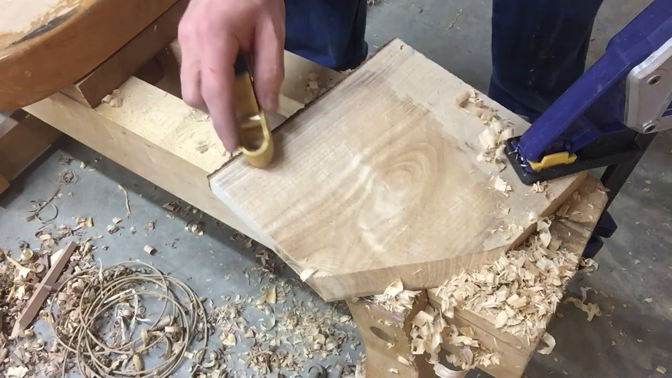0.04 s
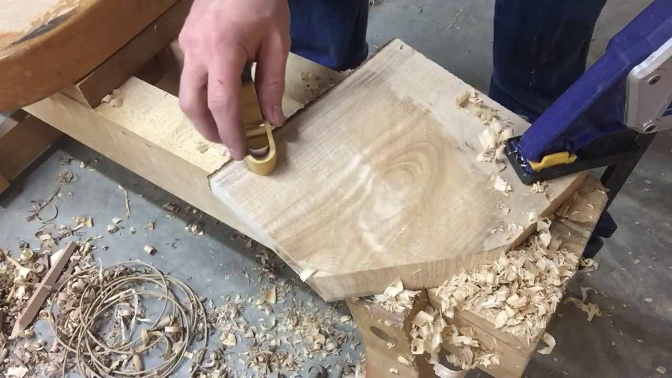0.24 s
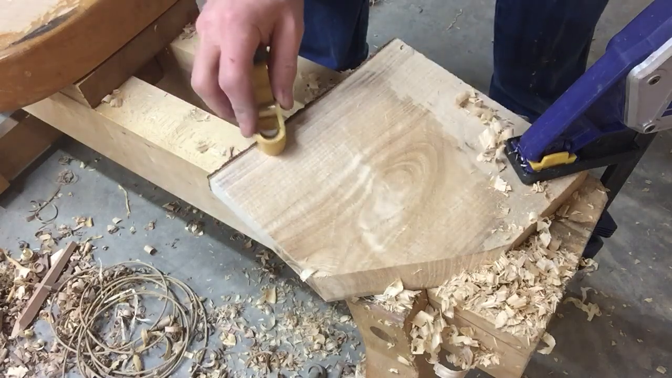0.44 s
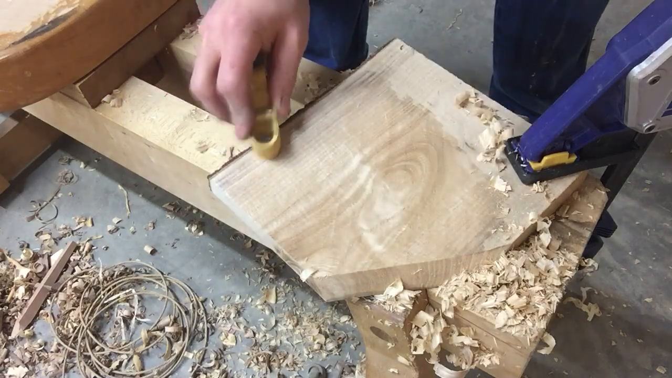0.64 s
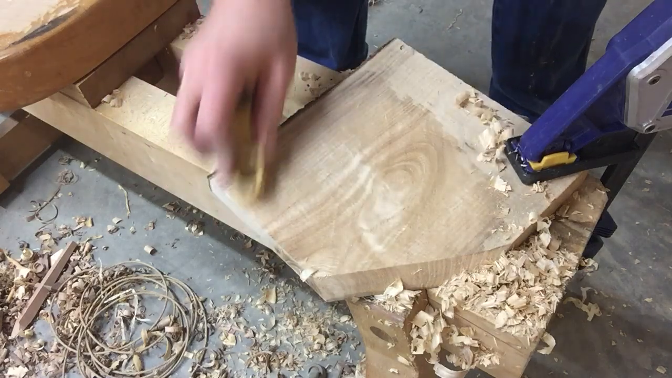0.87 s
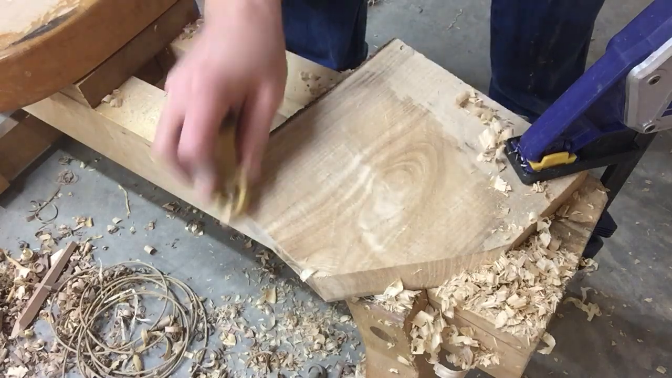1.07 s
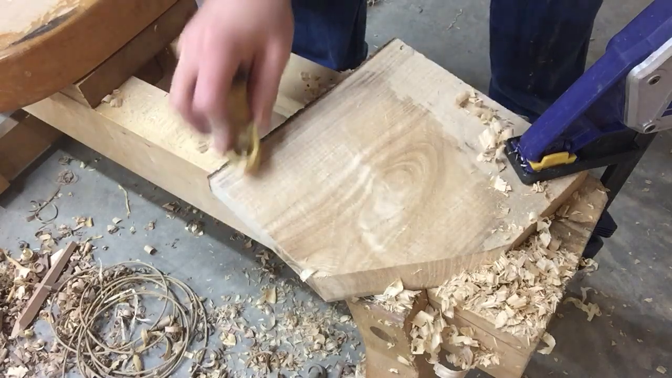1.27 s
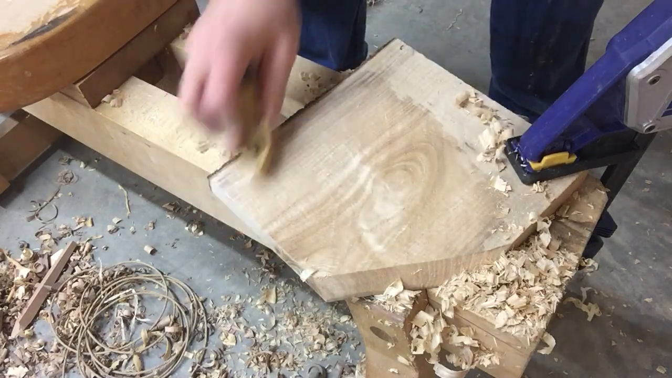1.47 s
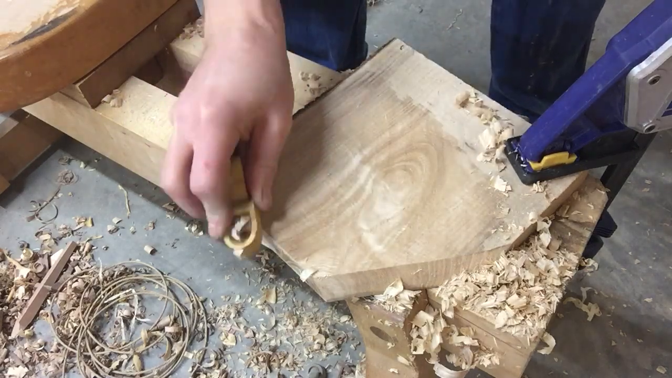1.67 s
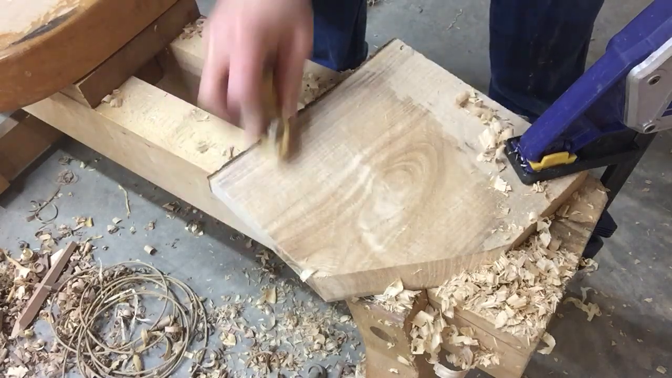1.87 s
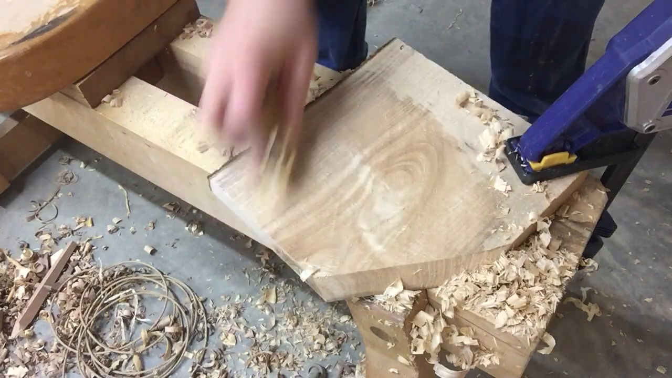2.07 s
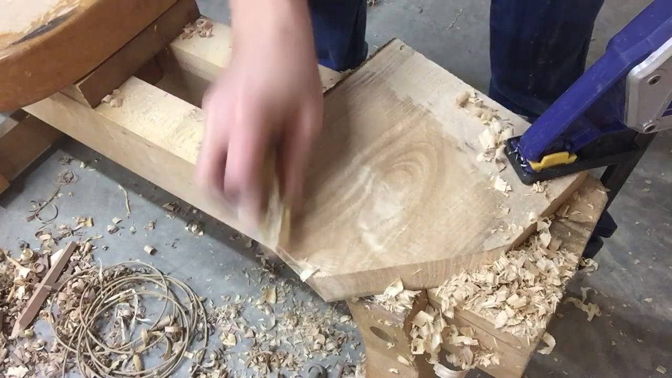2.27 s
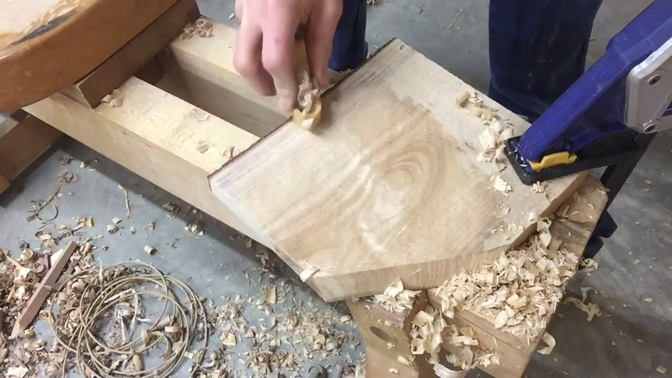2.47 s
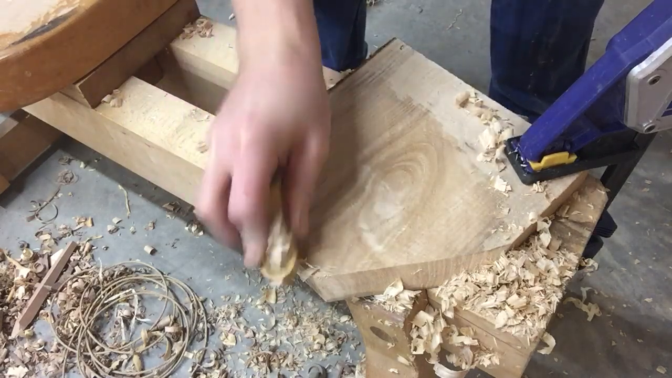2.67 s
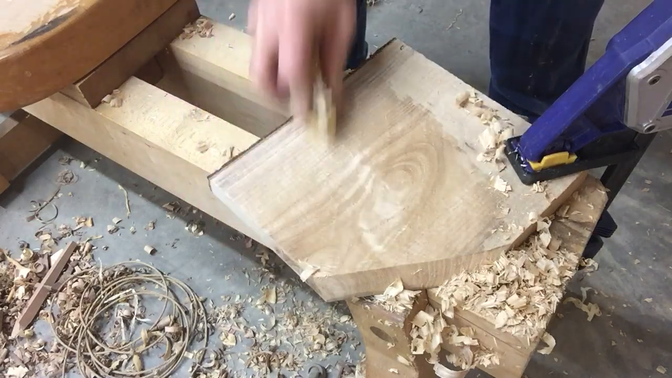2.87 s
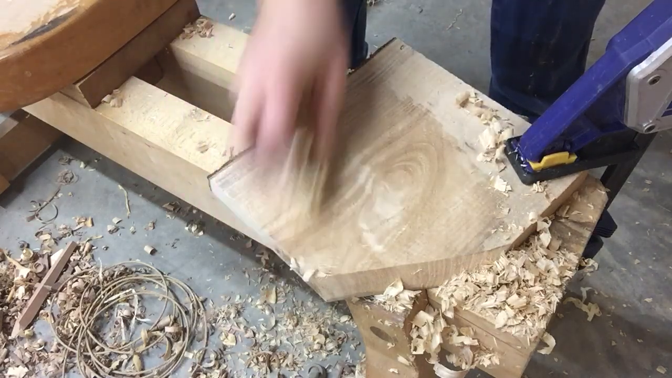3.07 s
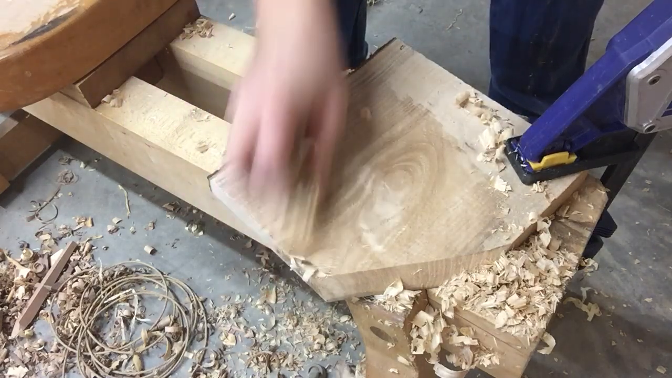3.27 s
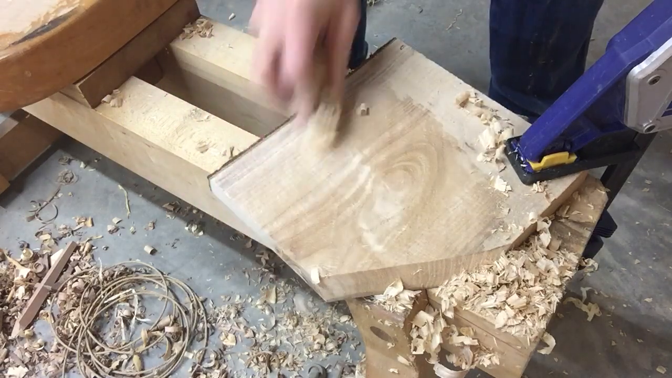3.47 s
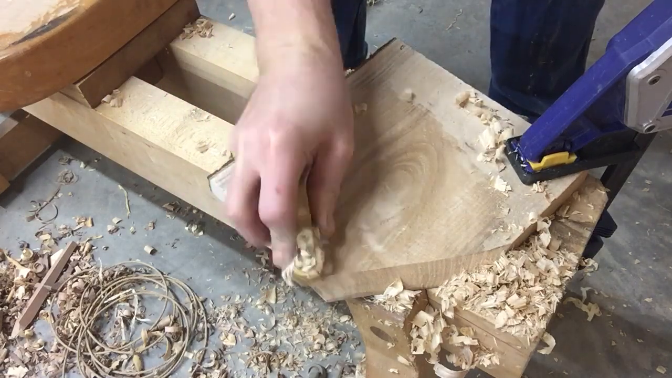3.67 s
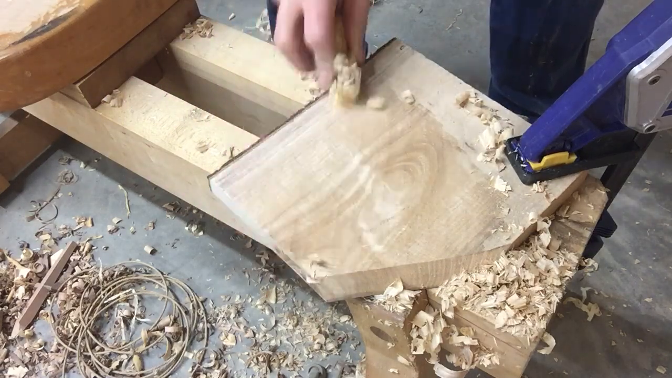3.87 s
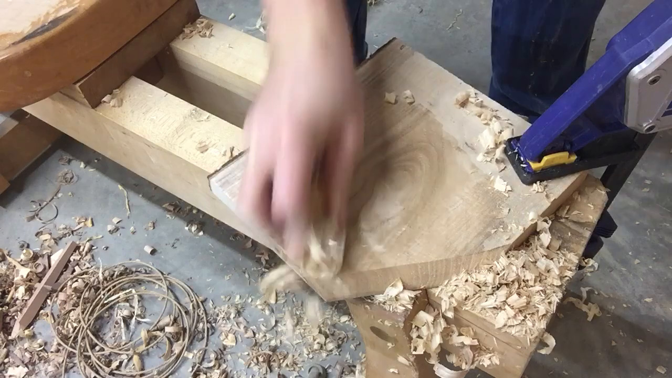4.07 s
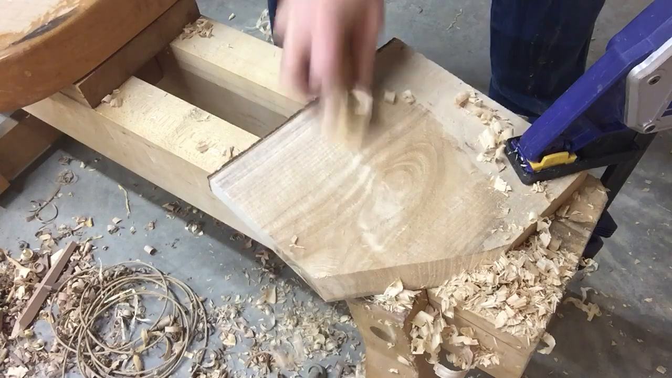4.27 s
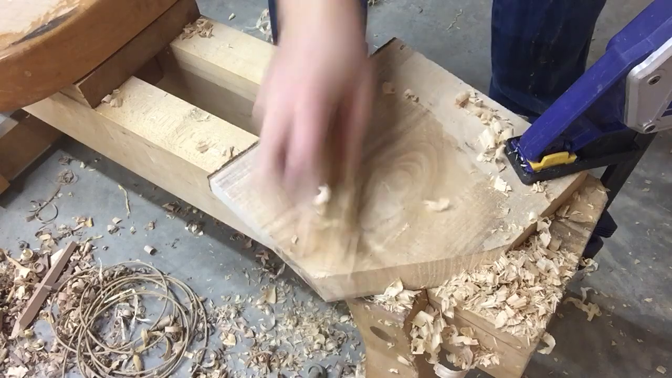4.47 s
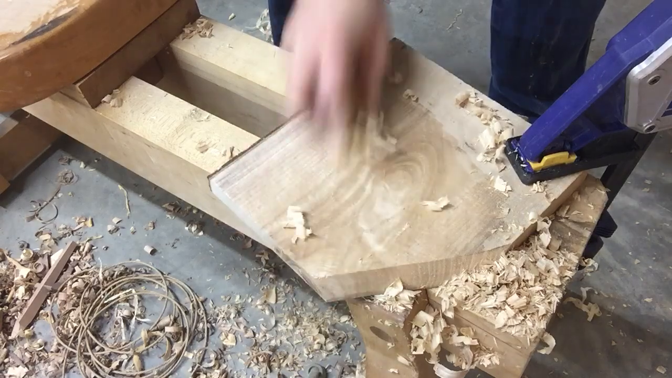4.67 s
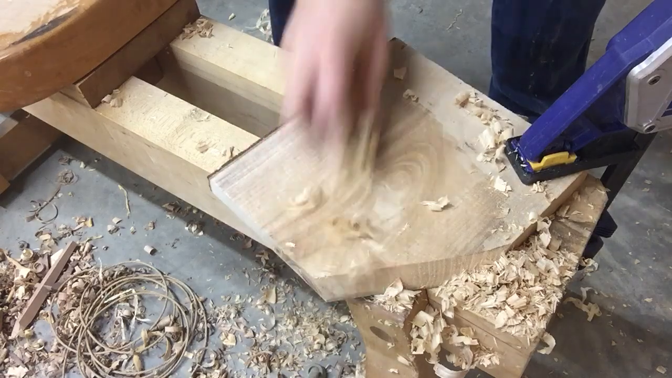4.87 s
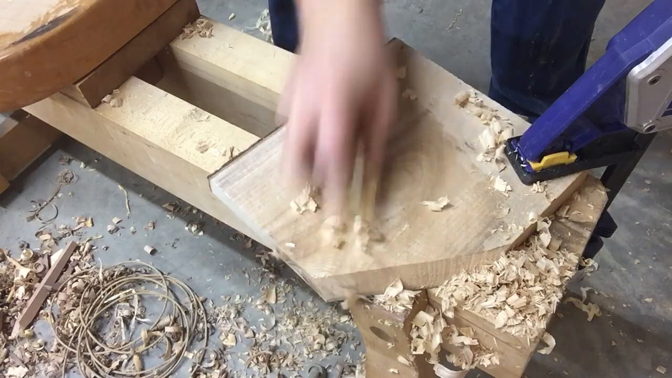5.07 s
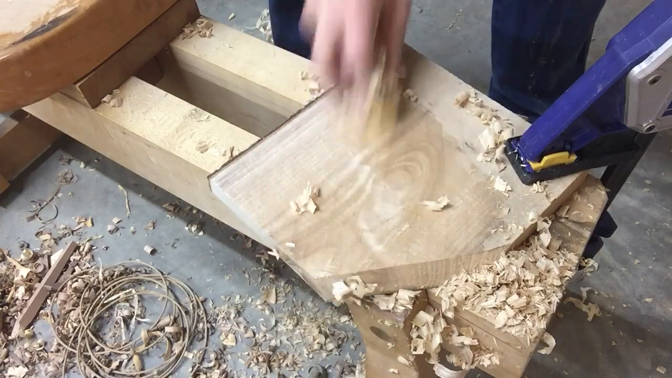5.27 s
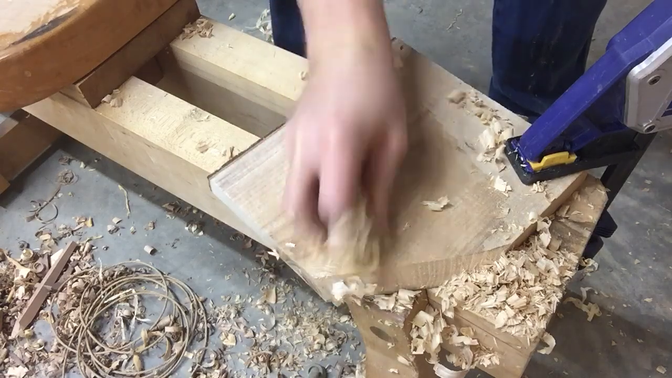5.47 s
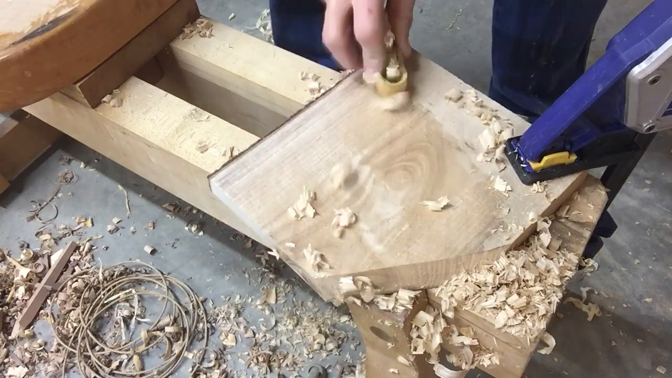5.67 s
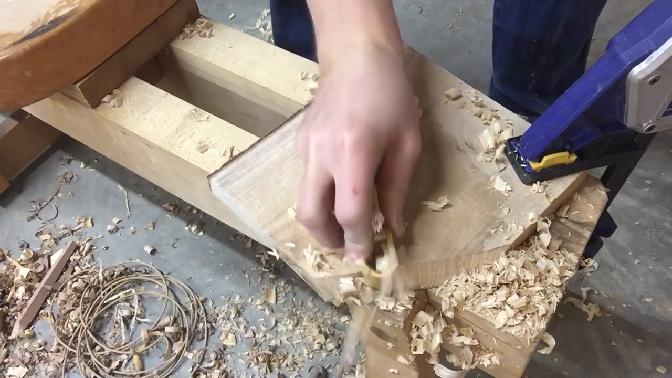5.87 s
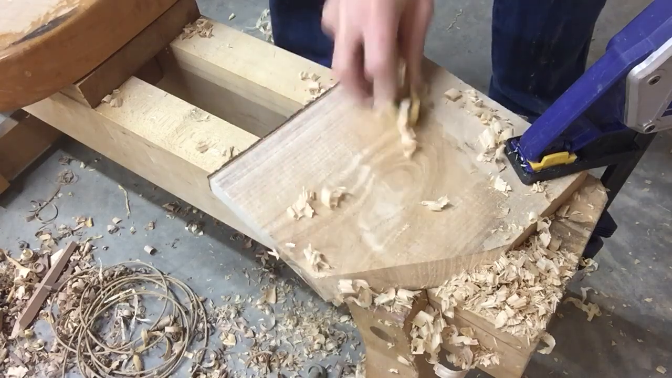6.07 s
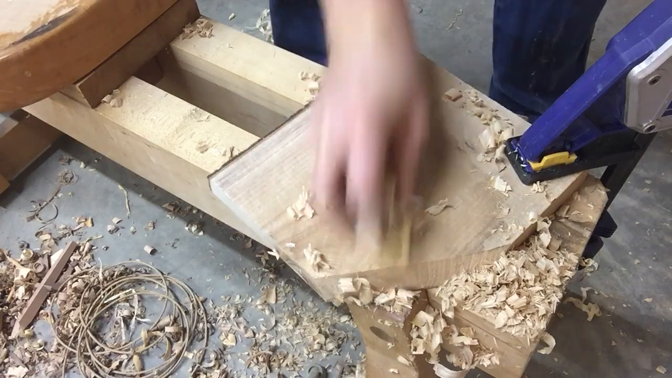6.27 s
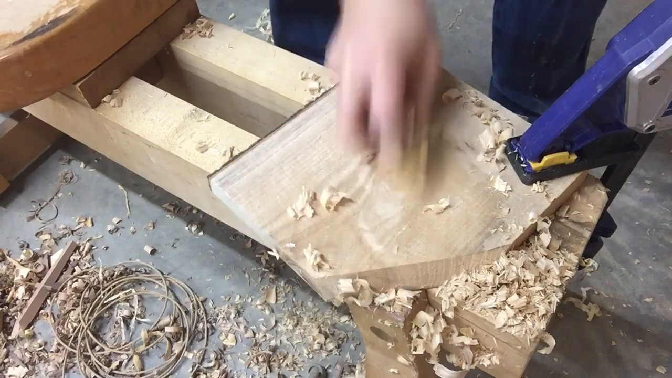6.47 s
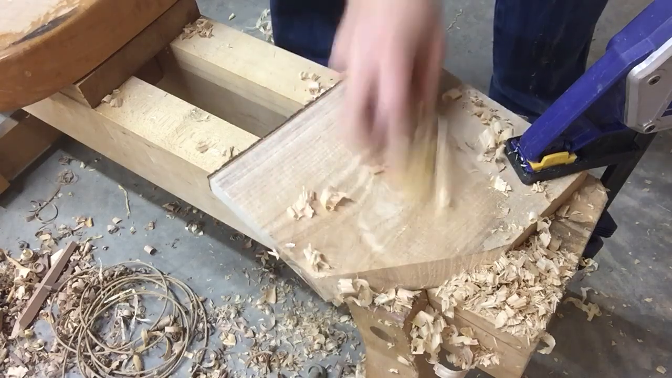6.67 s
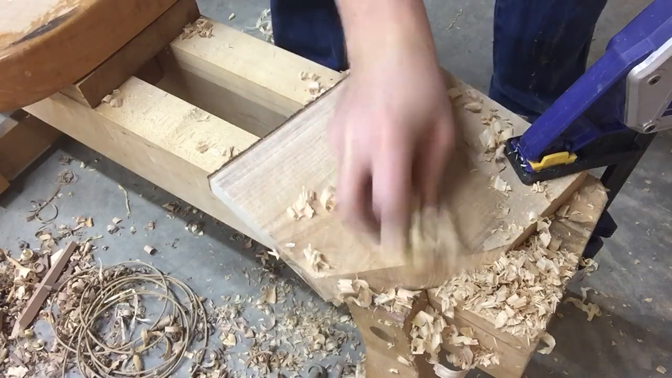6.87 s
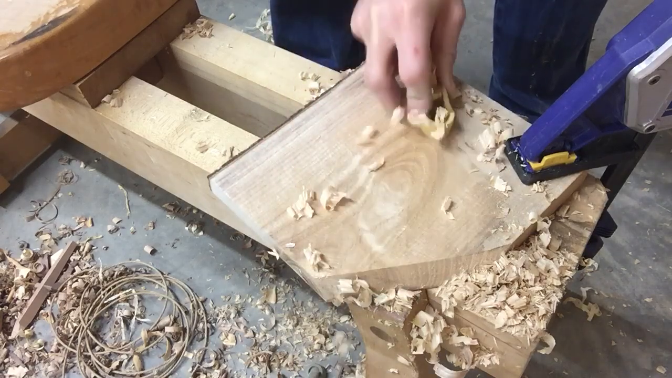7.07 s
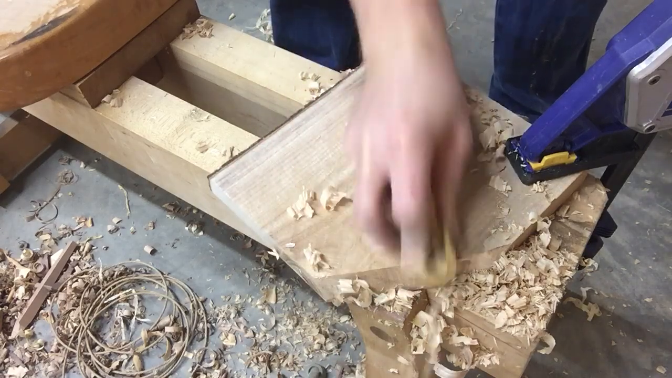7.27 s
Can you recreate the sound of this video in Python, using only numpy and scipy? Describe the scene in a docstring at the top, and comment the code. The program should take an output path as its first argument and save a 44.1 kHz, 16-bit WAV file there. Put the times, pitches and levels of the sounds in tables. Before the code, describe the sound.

Close to a small microphone indoors, a hand plane lands dully on wood, is nudged with barely audible creaks, and begins short rasping strokes. Each forward push is a gritty, resonant rip with a thin hiss; each return is a duller, softer scrape. Hollow knocks, soft thumps and rattly snags pepper the rhythm, strongest midway, continuing to the end over faint room hum.

```python
"""A quiet workshop hums; a small brass hand plane is set down on a clamped board with a dull knock.
Nudged into line with creaks and whispers, it is then worked to and fro about three times a second.
Pushes tear fibres: random snaps ring plane and board and hiss in the shaving; returns rub the sole.
Snags, knocks and thumps are short resonant bursts; rustles are brief, mostly treble, crinkling noise.
Sparse decaying reflections make the room."""
import sys
import numpy as np
from scipy import signal
from scipy.fft import rfft, irfft
from scipy.io import wavfile
from scipy.ndimage import uniform_filter1d

SR = 44100
rng = np.random.default_rng(int(sys.argv[2]) if len(sys.argv) > 2 else 0)


def generate_wav(sig):
    """Save sig (samples, or channels by samples) to the path in sys.argv[1] as 16-bit PCM at SR."""
    pcm = np.round(np.clip(np.atleast_2d(sig).T, -1, 1) * 32767).astype(np.int16)
    wavfile.write(sys.argv[1], SR, pcm)


N = 322812
TIME = np.arange(N) / SR

# cutting strokes, levels before mixing:
# start_s, length_s, attack_s, level_db, swell_db (start to end), board_re_level_db, hiss_re_level_db
PUSHES = [(.785, 0.091, 0.0068, -31, 6, -1, -13.5), (1.064, 0.11, 0.012, -30.5, 11, 0, -14),
          (1.369, 0.067, .029, -28, -2, -1, -15.5), (1.648, 0.087, 0.037, -27.5, 14, -2, -15.5),
          (1.93, .13, 0.024, -29, 9.5, 1, -12), (2.259, 0.13, 0.031, -25.5, 12.5, -3.5, -16),
          (2.603, 0.11, 0.021, -27, 4, -4, -13), (2.936, 0.14, 0.022, -24.5, 25, -4.5, -17.5),
          (3.289, 0.11, 0.022, -27.5, -4, -2.5, -13.5), (3.617, 0.14, 0.028, -23.5, 13, -7, -15),
          (3.974, 0.15, 0.031, -24.5, 16, -6, -15.5), (4.349, 0.13, 0.03, -22.5, -2.5, -7, -15),
          (4.729, 0.12, 0.023, -21, -0.5, -7, -16), (5.084, 0.14, 0.019, -23.5, -8, -7, -14),
          (5.449, .14, 0.035, -22.5, -4, -4, -15.5), (5.806, 0.14, 0.032, -21, -3.5, -4.5, -16.5),
          (6.15, 0.14, .022, -28, 16.5, -1.5, -12), (6.509, 0.13, 0.014, -24, 3, -5, -15.5),
          (6.838, 0.13, 0.03, -26.5, 17.5, -5, -12.5), (7.17, .14, 0.032, -27.5, 15, -6.5, -13)]
# gliding strokes, levels before mixing:
# start_s, length_s, attack_s, level_db, swell_db (start to end), board_re_level_db
RETURNS = [(0.667, 0.088, 0.051, -48.5, 26, -6), (0.75, 0.084, .01, -46, 5, -9),
           (0.936, 0.13, 0.04, -33.5, -12.5, 0), (1.232, 0.097, 0.023, -34.5, -19, -1),
           (1.494, 0.13, 0.048, -35, -18, 1.5), (1.791, .12, 0.04, -30.5, -6, 0.5),
           (2.113, 0.12, 0.0049, -30, -2, -7.5), (2.427, .133, 0.016, -32, -1.5, -4.5),
           (2.774, 0.055, 0.036, -26, -1, 2), (2.846, 0.051, 0.016, -29, 2, -5.5),
           (3.089, 0.14, .02, -34, 17, -4.5), (3.464, 0.14, 0.015, -32, -22.5, 0.5),
           (3.785, 0.15, .018, -31.5, 17, -3.5), (4.15, 0.15, 0.02, -29.5, 3.5, -2),
           (4.524, 0.13, 0.036, -26, 16, -4.5), (4.889, 0.13, 0.022, -29.5, 5.5, 2),
           (5.257, 0.15, 0.017, -28.5, 2, -2.5), (5.618, 0.14, 0.011, -28.5, 2, -3),
           (5.987, 0.15, 0.011, -31, 0.5, 1), (6.351, 0.13, .003, -30.5, -5, 4.5),
           (6.69, 0.13, 0.011, -30.5, 8, 2.5), (7.027, 0.13, 0.012, -29.5, 6, -2.5)]
# plane's place across the board: time_s, lane (0 left edge, 1 middle, 2 right)
LANE = [(.8, 0.26), (1.9, 0.32), (2.6, 1.12), (3.6, 0.83), (4.7, 1.35), (5.8, 1.74), (7.2, 1.5)]
# board modes: pitch_hz, width_hz, left_db, middle_db, right_db, rise_db (start to end of a push)
BOARD = [(149.5, 13, -16, -34.5, 0, -15), (195, 6.7, -16, -10.5, -3.5, -8),
         (228, 158, -13.5, -5.5, -21.5, 1.5), (425, 61, -6.5, -3.5, -18.5, 6.5),
         (511.6, 60, -2.5, 1, -16.5, 7), (680.5, 49, -1, 1, -3.5, 5.5), (766, 63, -3, 2.5, -9.5, 7),
         (893, 53, -3.5, 7.5, 0, 9.5), (1064, 44, -12.5, 2.5, -4.5, 31), (1205, 39, 9, 7.5, 9.5, 7),
         (1310, 69, 12, 9.5, 9, -0.5), (1358.5, 115, 8, 8, 7, 9), (1490, 44.5, 13.5, 5, 13, 5.5),
         (1605, 57, 10, -0.5, 8, 11), (1830, 12, 11.5, 9, -0.5, 9), (1943, 43, -1, 6, 2, 1),
         (2200, 40, -10, 8.5, -4.5, -10), (2510, 44, -18, -14, 9, 22), (2847, 43, 0.5, -4.5, -8.5, 23)]
# iron snagging in the grain, levels before mixing: peak_s, level_db, sigma_s, ring_hz
SNAGS = [(1.708, -34, 0.014, 3360), (2.033, -23, 0.0099, 2460), (2.356, -20.5, 0.0035, 3150),
         (2.37, -19.5, 0.0096, 2430), (3.057, -16.5, 0.0052, 3690), (3.069, -12, 0.0021, 2300),
         (3.288, -32, 0.0029, 2300), (3.734, -17.5, 0.007, 3740), (4.048, -19, 0.005, 5950),
         (4.097, -13.5, 0.0039, 3800), (4.377, -21.5, 0.0054, 4200), (4.458, -18, 0.0098, 3200),
         (4.74, -25, 0.004, 4260), (4.814, -26.5, 0.024, 1960), (5.207, -17, 0.0042, 3000),
         (5.821, -23, 0.01, 2300), (5.85, -22, 0.004, 2450), (5.873, -20.5, 0.0061, 3600),
         (5.927, -21.5, 0.0078, 3340), (6.042, -20, 0.0062, 2510), (6.276, -18.5, 0.0046, 3950),
         (6.549, -23.5, 0.01, 5970), (6.591, -20, 0.004, 3530), (6.626, -22, 0.0067, 3360),
         (6.958, -23.5, 0.0092, 3520), (7.286, -22, 0.0044, 3750)]

# release ramps: iron leaving the wood, sole stopping
EXIT_S, STOP_S = 0.015, 0.026


def amp(db):
    """Decibels to gain."""
    return 10 ** (np.asarray(db) / 20)


def unit(x):
    """Scales to an rms of one."""
    return x / np.sqrt(np.mean(x ** 2) + 1e-20)


def read(points, hz):
    """Interpolates a table on a log-frequency axis."""
    f, value = np.transpose(points)
    return np.interp(np.log(hz + 1), np.log(f + 1), value)


def add(mix, s, sound):
    """Adds a sound into the mix at time s."""
    part = mix[max(round(s * SR), 0):][:len(sound)]
    part += sound[:len(part)]


def wander(rate_hz):
    """Smooth unit-rms noise; its Gaussian spectrum falls to 1/e at the rate."""
    hz = np.fft.rfftfreq(N, 1 / SR)
    spectrum = rfft(rng.standard_normal(N)) * np.exp(-(hz / rate_hz) ** 2)
    return unit(irfft(spectrum, N))


def colour(x, points, size=2048):
    """Minimum-phase filter with the given spectrum that keeps the power of white noise."""
    log_gain = np.log(amp(read(points, abs(np.fft.fftfreq(size, 1 / SR)))))
    taps = np.fft.ifft(np.exp(np.conj(signal.hilbert(log_gain)))).real[:size // 2]
    return signal.oaconvolve(x, taps / np.linalg.norm(taps))[:len(x)]


def resonate(x, hz, width_hz):
    """One resonance, with gain one at its centre."""
    return signal.lfilter(*signal.iirpeak(hz, hz / width_hz, SR), x)


def soften(x, hz):
    """Wood soaks up the treble: second-order low-pass."""
    return signal.sosfilt(signal.butter(2, hz, fs=SR, output="sos"), x)


def fibres(per_s, spread_db, smooth, clump_db, clump_hz, swell_db):
    """Tiny fractures of uneven size over smooth friction, bunched by the grain of the wood."""
    sizes = amp(spread_db * np.minimum(rng.exponential(1, N), 4)) * rng.choice([-1, 1], N)
    snaps = unit(sizes * (rng.random(N) < per_s / SR))
    grain = amp(clump_db * np.tanh(wander(clump_hz)) + swell_db * np.tanh(wander(83)))
    return unit((snaps + smooth * rng.standard_normal(N)) * grain)


def travel():
    """Place along the board: -.5 at the start of a push, .5 at its end, linear between."""
    ends = [s for start, length, *_ in PUSHES for s in (start, start + length)]
    return np.interp(TIME, ends, [-.5, .5] * len(PUSHES))


def ring(force, modes):
    """Drives the modes of a body; where the plane is decides how they share the energy."""
    along, lane = travel(), np.interp(TIME, *np.transpose(LANE))
    out, power = np.zeros(N), 0
    for k, (hz, width_hz, *lanes_db, rise_db) in enumerate(modes):
        coupling = amp(np.interp(lane, np.arange(3), lanes_db) + rise_db * along)
        out += (-1) ** k * resonate(force * coupling, hz, width_hz)
        power += coupling ** 2 * np.pi * width_hz / SR
    return out / np.sqrt(power)


def stroke(start_s, length_s, attack_s, level_db, swell_db, release_s, sag_db):
    """Gain of one stroke: attack, a hold that swells or fades as the hand leans, release."""
    ramp_db, ramp_curve = 16, 1.35  # drop at either end, curvature of the ramps
    near = slice(max(int((start_s - .1) * SR), 0), int((start_s + length_s + .15) * SR))
    t, gain = TIME[near] - start_s, np.zeros(N)
    along = np.clip(t / length_s, 0, 1) - .5
    ramps = np.maximum(1 - t / attack_s, 0) + np.maximum(1 - (length_s - t) / release_s, 0)
    hold_db = level_db + swell_db * along + sag_db * (2 * along) ** 2
    gain[near] = amp(hold_db - ramp_db * ramps ** ramp_curve)
    return gain


def moving(x, patchy_db, comb_db, echo_s, stretch, size=512):
    """Sliding contact: patches vary with the grain, the echo from the board's edge sweeps a comb."""
    overlap = size * 3 // 4
    hz, t, z = signal.stft(x, SR, nperseg=size, noverlap=overlap)
    blur = np.outer(np.hanning(9), np.hanning(14))
    patches = unit(signal.fftconvolve(rng.standard_normal(z.shape[::-1]).T, blur, "same"))
    delay_s = echo_s * np.exp(stretch * np.interp(t, TIME, travel()))
    comb = np.cos(2 * np.pi * hz[:, None] * delay_s)
    # the effect fades in the top treble
    gain = amp((patchy_db * patches + comb_db * comb) / (1 + (hz[:, None] / 11000) ** 4))
    return signal.istft(z * unit(gain), SR, nperseg=size, noverlap=overlap)[1][:N]


def chatter(rows, width_hz, slips_per_s, jitter):
    """Short fits of stick and slip, each exciting one resonance through two equal filters."""
    turns = np.cumsum(slips_per_s * np.exp(jitter * wander(400))) / SR
    slips = np.diff(np.floor(turns), prepend=0) + 0.081 * rng.standard_normal(N)
    out = np.zeros(N)
    for s, db, sigma_s, hz in rows:
        near = slice(int(s * SR) - SR // 20, int(s * SR) + SR // 20)
        swell = np.exp(-.5 * ((TIME[near] - s) / sigma_s) ** 2)
        fit = resonate(resonate(slips[near] * swell, hz, width_hz), hz, width_hz)
        loudest_rms = np.sqrt(uniform_filter1d(fit ** 2, int(3 * sigma_s * SR) + 1).max())
        out[near] += amp(db) * fit / loudest_rms
    return out


def background():
    """Still air of the workshop as coloured noise, with a low wavering hum of narrow-band noise."""
    # air: band_hz, shape_db
    air_shape = [(25, -36), (45, -65), (70, 11.5), (100, -0.5), (200, -1), (350, -4), (500, -11.5),
                 (1000, -13.5), (2500, -18), (6000, -24.5), (10000, -31.5), (15500, -36)]
    air_db, hum_db, hum_hz, hum_width_hz = -64, -75, 86, 3.6
    air = colour(rng.standard_normal(N), air_shape, size=8192)
    hum = resonate(rng.standard_normal(N), hum_hz, hum_width_hz)
    hum = unit(resonate(hum, hum_hz, hum_width_hz))
    return amp(air_db) * air + amp(hum_db) * hum


def turning(dust_db, wood_db, far_db):
    """The sole stays on the wood and grinds faintly on dust, rising toward the far end."""
    # hand pressure: time_s, relative_db
    effort = [(.45, -20), (.7, -8), (.9, 5.5), (2.5, 7), (4, 11), (7.3, 10)]
    effort_db = np.interp(TIME, *np.transpose(effort))
    dust = fibres(per_s=1500, spread_db=3, smooth=.9, clump_db=2.5, clump_hz=200, swell_db=2)
    dust = dust * amp(effort_db + far_db * travel())
    grit = colour(dust, [(300, -6.0), (2200, 4.5), (4200, -8.5), (6200, -10),
                         (7500, -11), (10000, -17.0), (15700, -20)])
    return amp(dust_db) * grit + amp(wood_db) * soften(ring(dust, BOARD), hz=3000)


def set_down():
    """One dull knock of brass on wood: the board's modes over a short dead thud."""
    # pitch_hz, relative_db, t60_s
    modes = [(180, -13, 0.053), (225, -12, 0.047), (264, -4, 0.034), (590, 6.5, 0.022), (663, 5.5, 0.025),
             (710, -13, 0.081), (736, -11, 0.035), (1050, -16, .05), (1300, -6.5, 0.046), (1590, -17, .04),
             (1760, -22, 0.044), (1930, -20, 0.063), (2680, -24, .02)]
    start_s, level_db = .157, -25
    t, out = np.arange(SR // 4) / SR, np.zeros(N)
    knock = sum(amp(db - 60 * t / t60) * np.sin(2 * np.pi * hz * t) for hz, db, t60 in modes)
    knock *= 1 - np.exp(-t / 0.004)
    burst = rng.standard_normal(len(t)) * np.exp(-t / .003)
    thud = colour(burst, [(80, -15), (200, 0), (400, -2), (900, -3),
                          (2000, -14), (3500, -35), (8000, -55)])
    blow = knock / abs(knock).max() + amp(-10) * thud / abs(thud).max()
    add(out, start_s, amp(level_db) * blow)
    return out


def squeaks():
    """The sole creaks and squeaks by stick and slip as it is nudged into place."""
    # peak_s, level_db, sigma_s, pitch_hz
    rows = [(.315, -72, 0.013, 560), (.492, -49.5, 0.0041, 620), (.539, -53.5, 0.0043, 548),
            (.583, -64, .008, 4400), (.638, -64, 0.0091, 4360)]
    return chatter(rows, width_hz=74, slips_per_s=950, jitter=0.21)


def nudge():
    """The sole whispers over the wood as it is lined up for the first cut."""
    # time_s, level_db
    path = [(.36, -78), (.44, -74), (.53, -65), (.56, -74), (.66, -67), (.7, -51)]
    slide = fibres(per_s=4000, spread_db=1.0, smooth=0.9, clump_db=0, clump_hz=150, swell_db=0.0)
    level = amp(np.interp(TIME, *np.transpose(path)))
    level = level * (TIME > path[0][0]) * (TIME < path[-1][0])
    return level * colour(slide, [(1000, -3), (2600, 4), (3600, -4), (4650, 4.5), (6000, 0),
                                  (7400, -10), (8500, -7), (10500, -17), (15700, -23)])


def returns():
    """The sole drags back over ridges of the grain: duller, with more of the board in it."""
    # band_hz, shape_db
    rubbing = [(100, -26), (400, -5), (1200, 6), (2300, 9.5), (2800, 8.5), (3400, 0.5), (4300, 6),
               (5100, 2.5), (6100, 4.5), (7500, -11), (9000, -8), (10500, -16.5), (11500, -16),
               (15700, -24)]
    sag_db, board_sag_db, board_swell_share = -5, -4.5, 0.9
    low_hz = 306  # the light stroke hardly moves the board below this
    drag = fibres(per_s=3000, spread_db=0.5, smooth=1.0, clump_db=-4.0, clump_hz=248, swell_db=3.5)
    bumps = fibres(per_s=1800, spread_db=3, smooth=0.85, clump_db=2.5, clump_hz=200, swell_db=2.5)
    rub, board = np.zeros((2, N))
    for start, length, attack, db, swell, ring_db in RETURNS:
        rub += stroke(start, length, attack, db, swell, STOP_S, sag_db)
        board += stroke(start, length, attack, db + ring_db, board_swell_share * swell,
                        STOP_S, board_sag_db)
    sole = amp(-3.0) * colour(drag * rub, rubbing)
    wood = amp(1.5) * soften(ring(bumps * board, BOARD), hz=3000)
    high_pass = signal.butter(2, low_hz, "highpass", fs=SR, output="sos")
    scrape = signal.sosfilt(high_pass, sole + wood)
    return moving(scrape, patchy_db=4.0, comb_db=2.0, echo_s=0.000856, stretch=0.6)


def bench(level_db, hz, width_hz, overhang_db):
    """Strokes rock the bench at its lowest mode, more so near an edge of the board."""
    shove = np.sqrt(sum(stroke(*row[:5], release_s=.03, sag_db=-17) for row in PUSHES + RETURNS))
    off_centre = abs(np.interp(TIME, *np.transpose(LANE)) - 1)
    force = shove * amp(overhang_db * off_centre) * rng.standard_normal(N)
    return amp(level_db) * unit(resonate(resonate(force, hz, width_hz), hz, width_hz))


def rustles():
    """A loose shaving crinkles as it is brushed aside: fine snaps, mostly treble."""
    # peak_s, level_db, sigma_s
    rows = [(.728, -57, 0.012), (3.14, -47.5, 0.026), (3.42, -67, .012), (5.579, -32, .004)]
    crinkle = fibres(per_s=5600, spread_db=6, smooth=.7, clump_db=4.5, clump_hz=300, swell_db=-2.0)
    level = sum(amp(db) * np.exp(-.5 * ((TIME - s) / sigma_s) ** 2) for s, db, sigma_s in rows)
    return colour(crinkle * level, [(3000, -19), (7000, -7), (10000, -3), (15700, 2)])


def contact():
    """How firmly the iron cuts: it sticks, so the tearing dips, just before each snag."""
    stick_db, stick_s = -2.5, 0.0054
    db = np.zeros(N)
    for s, _, sigma_s, _ in SNAGS:
        near = slice(int(s * SR) - SR // 20, int(s * SR) + SR // 20)
        dip = stick_db * np.exp(-((TIME[near] - s + sigma_s + stick_s) / stick_s) ** 2)
        db[near] = np.minimum(db[near], dip)
    return amp(db)


def pushes():
    """The iron tears fibres: they ring plane and board while the shaving hisses out of the mouth."""
    # plane and iron: pitch_hz, width_hz, left_db, middle_db, right_db, rise_db (start to end of push)
    plane = [(2300, 430, 9, 18.5, 0, -24), (2730, 270, 10, -40, 14, 50), (2870, 410, 21.5, -21, -5, 18),
             (3413, 200, 14, 6.5, 10.5, 16), (3838, 55, -33, 15, 2, 6), (3830, 300, -34, 8, -28, -4),
             (4290, 30, -4, 11, 19, 14), (5000, 450, 21, -27, 16, -29), (5790, 410, 12, 18, -6, -6),
             (6387, 550, -19, 19, -7.5, -4), (6170, 600, -23, -10.5, 14, -17), (7690, 1700, -37, -1, 6, 5),
             (8800, 700, -26, -47, 0, 16)]
    # band_hz, shape_db
    tearing = [(100, -39.5), (300, -6), (700, 0.5), (1500, -3.5), (2400, 15), (3200, 3.5), (4300, 15.5),
               (5100, 10), (6000, 7.5), (6700, 9.5), (9000, -39), (11000, -71)]
    # band_hz, shape_db
    shaving = [(5000, -23.5), (7500, 6), (9000, 3), (9800, 3), (10400, -7.5), (11500, 0), (12500, -4),
               (13600, -2.5), (15700, -7.5)]
    sag_db = 2  # eases in mid stroke
    board_swell_share, board_lag_s = 0.27, 0.0027  # board shakes on after the iron leaves
    hiss_swell_share, hiss_attack_s, hiss_break_s, hiss_early_s = 0.65, .015, .012, 0.00083
    firmness = contact()
    tear = firmness * fibres(per_s=4000, spread_db=3, smooth=0.51,
                             clump_db=-0.2, clump_hz=350, swell_db=4.0)
    split = firmness * fibres(per_s=3000, spread_db=5, smooth=0.38,
                              clump_db=-3.0, clump_hz=300, swell_db=3.0)
    curl = fibres(per_s=16000, spread_db=0.5, smooth=0.66, clump_db=1.0, clump_hz=400, swell_db=1.5)
    cut, board, hiss = np.zeros((3, N))
    for start, length, attack, db, swell, ring_db, hiss_db in PUSHES:
        cut += stroke(start, length, attack, db, swell, EXIT_S, sag_db)
        board += stroke(start, length + board_lag_s, attack, db + ring_db,
                        board_swell_share * swell, EXIT_S, sag_db=4.0)
        hiss += stroke(start, length - hiss_early_s, hiss_attack_s, db + hiss_db,
                       hiss_swell_share * swell, hiss_break_s, sag_db=-1.0)
    iron = amp(-6.5) * colour(tear * cut, tearing)
    iron += amp(-5.5) * soften(ring(split * cut, plane), hz=9300)
    wood = amp(2.0) * soften(ring(tear * board, BOARD), hz=3200)
    curls = amp(-2.5) * colour(curl * hiss, shaving)
    return moving(iron + wood + curls, patchy_db=3.0, comb_db=1.0, echo_s=0.000336, stretch=0.14)


def rumble(level_db, share, sag_db):
    """The push makes the whole board rumble, following only a share of each push's level in dB."""
    # band_hz, shape_db
    shape = [(70, -26), (110, -14), (160, 0.5), (260, -2), (330, -3), (450, 5.5), (700, -8), (1500, -50)]
    shove = sum(stroke(start, length, attack, share * db, 0, EXIT_S, sag_db)
                for start, length, attack, db, *_ in PUSHES)
    return amp(level_db) * colour(shove * rng.standard_normal(N), shape)


def knocks(breadth, dead, crack_db):
    """Each blow of the sole is a thud at its own pitch plus a brief broad crack of the board."""
    # start_s, level_db (before mixing), centre_hz
    rows = [(1.54, -16.5, 1270), (1.158, -19, 1700), (1.798, -21.5, 904), (2.121, -23, 758),
            (2.777, -29, 1050), (2.793, -13, 1080), (3.051, -16.5, 1200), (3.458, -16, 900),
            (3.886, -16, 1310), (4.1, -11.5, 1750), (4.219, -14.5, 895), (4.461, -9.5, 1104),
            (4.828, -8, 1830), (5.209, -13.5, 1710), (5.286, -14, 1200), (5.328, -13.5, 1310),
            (5.567, -11, 1030), (5.85, -9.5, 1300), (6.008, -16, 1580), (6.035, -23, 1300),
            (6.073, -12, 1490), (6.354, -18.5, 1160), (6.394, -13, 1130), (6.433, -11.5, 895),
            (6.629, -9, 1300), (6.784, -11, 1370), (6.965, -9.5, 1490), (7.048, -18, 1110),
            (7.103, -15, 1310)]
    out, t, modes = np.zeros(N), np.arange(SR // 8) / SR, 0
    for k, (hz, width_hz, _, middle_db, _, _) in enumerate(BOARD):
        decay = np.exp(-np.pi * width_hz * t)
        modes += (-1) ** k * amp(middle_db) * width_hz * decay * np.cos(2 * np.pi * hz * t)
    answer = 2 * np.pi * modes / SR + dead * (t == 0)
    for s, db, hz in rows:
        thud = soften(resonate(answer, hz, breadth * hz), hz * 2)
        burst = rng.standard_normal(len(t)) * np.exp(-t / .0018)
        crack = colour(burst, [(150, -10.5), (500, -43.0), (1200, 6), (2500, 8.5),
                               (6000, 13), (8000, -16), (15000, -42)])
        blow = thud / abs(thud).max() + amp(crack_db) * crack / abs(crack).max()
        add(out, s, amp(db) * blow)
    return out


def rocking(t60_s, soft_s):
    """The board dips under the hand and bumps its supports: three modes in a soft thump."""
    # start_s, level_db (of the lowest mode, before its envelope), lowest_mode_hz
    rows = [(1.44, -39.5, 202), (1.699, -40, 195), (1.541, -30.5, 203), (1.865, -33.5, 191),
            (1.998, -31, 195), (2.118, -42, 231), (2.29, -37, 188), (2.98, -34, 180), (3.037, -48, 170),
            (3.49, -38, 195), (4.26, -39, 193), (6.443, -38, 197)]
    out, t = np.zeros(N), np.arange(SR // 6) / SR
    for s, db, hz in rows:
        modes = np.sin(2 * np.pi * hz * t)
        modes -= amp(1.0) * np.sin(2 * np.pi * 1.39 * hz * t)
        modes += amp(6.5) * np.sin(2 * np.pi * 2.64 * hz * t)
        add(out, s, amp(db - 60 * t / t60_s) * (1 - np.exp(-t / soft_s)) * modes)
    return out


def snags():
    """The iron snags in the grain and chatters by stick and slip."""
    return chatter(SNAGS, width_hz=760, slips_per_s=360, jitter=0.3)


def springing():
    """The plane runs off the far edge and the freed board springs back, ringing one mode."""
    # start_s, level_db (before the envelope)
    rows = [(5.929, -42), (6.28, -32.5), (6.631, -33), (6.969, -54)]
    mode_hz, t60_s, rise_s = 434, 0.12, 0.008
    out, t = np.zeros(N), np.arange(SR // 4) / SR
    envelope = amp(-60 * t / t60_s) * (1 - np.exp(-t / rise_s))
    note = envelope * np.sin(2 * np.pi * mode_hz * t)
    for s, db in rows:
        add(out, s, amp(db) * note)
    return out


def room(x, delay_s, size=256):
    """Sparse reflections of random sign, each band dying at its own speed."""
    # band_hz, t60_s
    decay = [(150, 1), (500, 0.3), (1500, 0.3), (4000, 0.22), (8000, 0.2), (15000, 0.21)]
    count = SR // 2
    taps = rng.choice([-1., 1.], count) * (rng.random(count) < 3000 / SR) * (TIME[:count] > delay_s)
    hz, t, z = signal.stft(taps, SR, nperseg=size)
    tail = signal.istft(z * amp(-60 * t / read(decay, hz)[:, None]), SR, nperseg=size)[1]
    return signal.oaconvolve(soften(x, hz=5770), tail / np.linalg.norm(tail))[:N]


def scene():
    """Sums the work of the plane, the room's answer to it, the bench and the background."""
    work = turning(dust_db=-61.0, wood_db=-58.5, far_db=7.0) + set_down() + squeaks() + nudge()
    work += returns() + rustles() + pushes()
    work += rumble(level_db=-37, share=0.62, sag_db=-2.5)
    work += amp(-4.5) * knocks(breadth=0.086, dead=1.0, crack_db=-5.0)
    work += rocking(t60_s=0.032, soft_s=0.0011)
    work += amp(-6.0) * snags() + springing()
    drone = bench(level_db=-68.5, hz=82.3, width_hz=10.5, overhang_db=31)
    return (work + amp(-14) * room(work, delay_s=0.0058) + drone + background())[None]


def record(dry):
    """The small microphone loses the deepest bass; then the recorder's steep band limit."""
    mic_order, mic_low_hz, edge_hz = 3, 61, 15780
    high_pass = signal.butter(mic_order, mic_low_hz, "highpass", fs=SR, output="sos")
    thin = signal.sosfilt(high_pass, dry)
    band_limit = signal.firwin(801, edge_hz, window=("kaiser", 9), fs=SR)
    return signal.oaconvolve(thin, band_limit[None], "same")


dry = scene()
out = record(dry)
generate_wav(out)
```